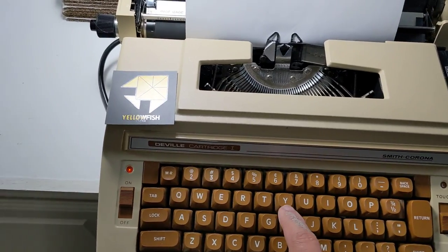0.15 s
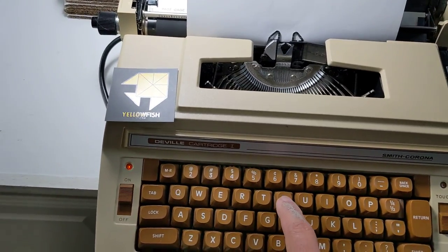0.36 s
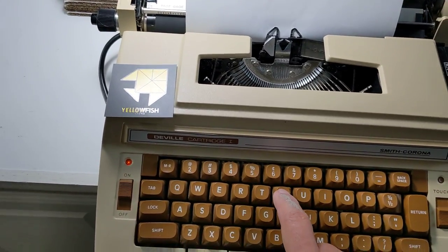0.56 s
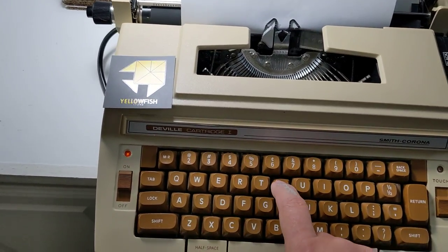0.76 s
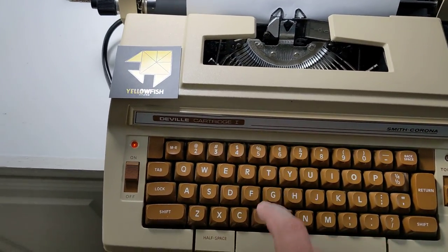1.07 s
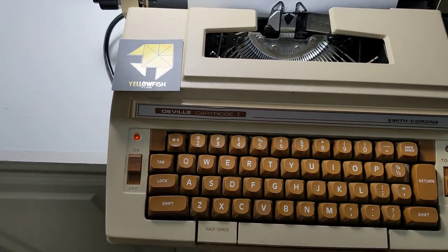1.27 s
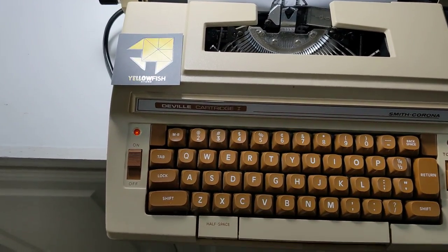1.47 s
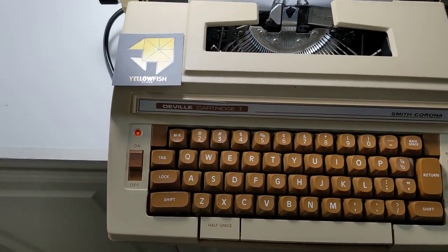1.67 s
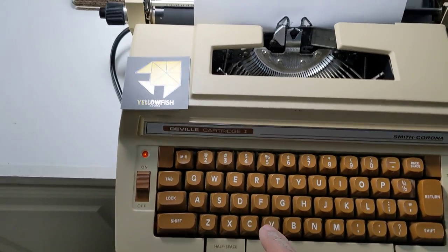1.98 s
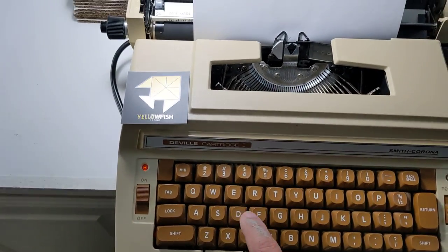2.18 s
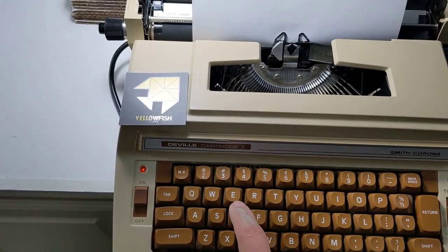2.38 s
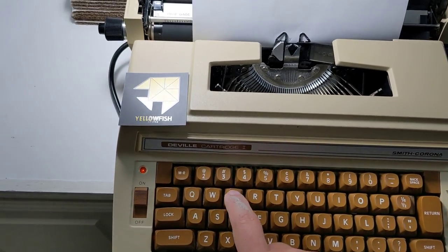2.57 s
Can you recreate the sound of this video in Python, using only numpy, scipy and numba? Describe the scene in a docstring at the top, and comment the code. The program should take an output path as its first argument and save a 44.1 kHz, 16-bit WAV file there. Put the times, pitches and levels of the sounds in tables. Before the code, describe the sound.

Electric typewriter hums steadily, then a single key snaps loudly with a short, hard room echo

```python
"""On a desk in a hard room, an electric typewriter idles close to a phone.
One key is pressed: linkage clicks, the type bar cracks on the platen, rattles back and the parts settle.
Each contact is a short noise burst that rings the metal frame and echoes in the room.
Behind it: belt ticks as small bursts, mains hum and motor whine as sines, casing and hiss as coloured noise.
A gain control ducks the hum under the stroke and lets it back as the room dies."""
import sys
import numpy as np
from scipy import signal
from scipy.io import wavfile
from scipy.ndimage import uniform_filter1d, minimum_filter1d
from numba import njit

SR = 44100
rng = np.random.default_rng(int(sys.argv[2]) if len(sys.argv) > 2 else 0)


def persist_wave(psi):
    """Save psi, clipped to +-1, as 16-bit WAV."""
    counts = np.round(np.clip(psi, -1, 1) * 32767).astype(np.int16)
    wavfile.write(sys.argv[1], SR, np.atleast_2d(counts).T)


N = 120393  # length of the scene [samples]


def amp(db):
    """Turn decibels into a factor on the wave."""
    return 10 ** (np.asarray(db) / 20)


def evened(x):
    """Scale to an rms of 1."""
    return x / np.sqrt(np.mean(x ** 2) + 1e-20)


def read(points, hz):
    """Read a table of (frequency, value) at any frequency, on a logarithmic scale."""
    f, value = np.transpose(points)
    return np.interp(np.log(hz + 1), np.log(f + 1), value)


def over_time(points):
    """Turn a table of (time [s], level [dB]) into a smooth run of gains."""
    s, db = np.transpose(points)
    return amp(np.interp(np.arange(N) / SR, s, db))


def sides(pan_db):
    """Left and right gains around the mean; positive leans left."""
    return amp([[pan_db / 2], [-pan_db / 2]])


def alike(a, b, same):
    """Mix two independent noises into a left-right pair with a given likeness."""
    return np.array([a, same * a + np.sqrt(1 - same ** 2) * b])


def drift(rate_hz):
    """Slow chance movement of rms 1, made by smoothing noise at one step per 64 samples."""
    steps = N // 64 + 2
    smoother = signal.butter(2, min(rate_hz * 128 / SR, .9))
    x = signal.lfilter(*smoother, rng.standard_normal(steps + 500))[500:]
    return np.interp(np.arange(N) / 64, np.arange(steps), evened(x))


def band(x, hz, width_hz):
    """A resonance of gain 1: lets through sound near one pitch."""
    r = np.exp(-np.pi * width_hz / SR)
    w = 2 * np.pi * min(hz, SR / 2.2) / SR
    return signal.lfilter([(1 - r * r) / 2, 0, -(1 - r * r) / 2], [1, -2 * r * np.cos(w), r * r], x)


RISE_SHARE = .12  # part of each contact's hold spent rising
GRAIN_DB, SAME_CONTACT = 3, .3  # roughness [dB rms], left-right likeness


def contacts(rows):
    """Parts that touch: grainy bursts that hold, die and take their own colour, at the energy of their row."""
    t = np.arange(8192) / SR
    out = np.zeros((2, N + len(t)))
    for s, db, hz, width_hz, hold_s, t60, pan_db in rows:
        a, b, grain = rng.standard_normal((3, len(t)))
        rise = np.minimum(t / (RISE_SHARE * hold_s), 1)
        shape = rise * amp(-60 * np.maximum(t - hold_s, 0) / t60)
        grainy = shape * amp(GRAIN_DB * evened(uniform_filter1d(grain, 24)))
        burst = alike(a, b, SAME_CONTACT) * grainy
        burst = band(band(burst, hz, width_hz), hz, 2 * width_hz)
        burst *= np.linalg.norm(shape) / np.linalg.norm(burst, axis=1, keepdims=True)
        at = round(s * SR)
        out[:, at:at + len(t)] += amp(db) * sides(pan_db) * burst
    return out[:, :N]


# Contacts in the key stroke: (time [s], level [dB], colour [Hz], colour width [Hz],
# hold [s], time to die by 60 dB before colouring [s], left-right [dB])
KEY_CONTACTS = [(.7612, -47, 7700, 1500, 0.00028, .012, -0.5), (.7612, -49, 11500, 7000, .002, 0.03, 4),
                (.762, -58, 3000, 4000, .01, .06, 3), (.7875, -42, 14000, 4000, .006, .04, 8),
                (.7875, -47, 1700, 3000, 0.022, 0.06, 6), (.7935, -43, 11500, 4000, 0.0016, .03, 1),
                (.8015, -29, 7200, 1800, 0.00073, 0.0099, -2.5), (.802, -43, 13000, 12000, .004, .06, 2),
                (.819, -30, 14000, 5000, .008, .02, 7), (.819, -35, 5500, 6100, .013, 0.011, 1),
                (.82, -25, 950, 1200, .012, .012, 4), (.821, -36, 400, 400, .012, .03, 0),
                (.824, -28, 2200, 1500, .003, .015, 7), (.8285, -16, 13600, 5000, .0042, .004, 4),
                (.836, -30, 12000, 8000, .006, .005, 0), (.842, 2, 2300, 1700, .0007, .005, 0),
                (.8422, 2, 5500, 3050, .0006, .006, 2), (.8424, -1, 8610, 2500, .0008, .006, -3),
                (.8445, -8, 4400, 1200, .001, .015, 0), (.8424, -4, 14800, 4000, .002, .02, 4),
                (.843, -22, 1050, 600, .04, .1, 0), (.843, -30, 350, 350, .02, .15, 0),
                (.843, -31, 80, 150, .03, .2, 1), (.8492, -7, 4500, 6000, .001, .035, -3),
                (.851, -14, 14500, 4000, .014, .04, 0), (.8638, -11, 5000, 2500, .0006, .015, -6),
                (.868, -8, 14700, 4000, .008, .03, 2), (.87, -15, 7000, 1200, .006, .03, -3),
                (.877, -14, 4500, 9000, .008, .14, -3), (.877, -21, 570, 60, .008, .04, -4),
                (.8853, -6, 14500, 4000, .002, .04, 0), (.955, -25, 3300, 5500, .05, .11, 0),
                (.96, -35, 800, 1200, .07, .18, 0), (.93, -39, 65, 80, .1, .15, 1),
                (.966, -15, 13500, 6000, .008, .015, 0), (1.1025, -44, 13800, 5000, .003, .02, -3),
                (1.155, -55, 13500, 6100, 0.0018, 0.017, -1)]


def key_stroke():
    """Linkage clicks, the crack of the type bar, its rattle back and the settling parts."""
    return contacts(KEY_CONTACTS)


# Faint ticks of the drive belt: (time [s], level [dB])
BELT_TICKS = [(0.2465, -60), (0.6467, -59), (1.647, -63), (1.777, -66), (2.251, -67), (2.6489, -66)]
# The three colours in each tick: (frequency [Hz], width [Hz], added level [dB])
TICK_COLOURS = [(2200, 2500, -3), (7000, 6000, -3), (14000, 4000, 0)]
TICK_HOLD_S, TICK_T60_S, TICK_PAN_DB = .002, .032, 4


def belt_ticks():
    """Each tick of the belt is three contacts at once, one per colour."""
    rows = []
    for s, db in BELT_TICKS:
        for hz, width_hz, more_db in TICK_COLOURS:
            rows.append((s, db + more_db, hz, width_hz, TICK_HOLD_S, TICK_T60_S, TICK_PAN_DB))
    return contacts(rows)


# What the metal frame and bars ring with: (frequency [Hz], relative level [dB], time to die by 60 dB [s])
FRAME_MODES = [(840, -8, .04), (1150, -8, .04), (1900, 1, .06), (2080, -1, .05), (2590, -4, .02),
               (3780, -2, .05), (4360, 0, .035), (4930, -2, .04), (5700, -5, .03), (6930, -1, .05),
               (7500, -4, .06), (8700, -2, .025), (11600, 0, .12), (14300, -3, .04)]
RING_DB = -15  # ringing, added to the direct contacts


def frame(x):
    """The contacts ring the machine's modes, each heard with another phase at each port."""
    t = np.arange(6000) / SR
    ring = np.zeros((2, len(t)))
    for hz, db, t60 in FRAME_MODES:
        turns = hz * t + rng.random((2, 1))
        ring += amp(db - 60 * t / t60) * np.sin(2 * np.pi * turns)
    ring /= np.linalg.norm(ring[0])
    return x + amp(RING_DB) * signal.fftconvolve(x, ring, axes=1)[:, :N]


# How long the room's early echoes last: (frequency [Hz], time to die by 60 dB [s])
ROOM_T60 = [(150, .34), (600, .32), (1200, .28), (2500, .29), (5000, .285), (9000, .24), (14000, .2)]
# Colour of the echoes: (frequency [Hz], relative level [dB])
ROOM_COLOUR = [(100, 0), (400, -13.5), (1000, 9), (2500, 6), (6000, 2), (10000, -4), (12000, -1),
               (15000, 1)]
ROOM_DB, ROOM_PAN_DB, ROOM_GAP_S = -3, -.8, .003  # the gap is the quiet before the first echo
LATE_DB, LATE_STRETCH = -26, 2.5  # fainter tail of the far walls, lasting this many times longer


def room(x):
    """Dense random echoes, each band dying at its own speed over a fainter long tail, other echoes per port."""
    taps = rng.standard_normal((2, SR)) * (np.arange(SR) > ROOM_GAP_S * SR)
    hz, t, z = signal.stft(taps, SR, nperseg=128)
    fall_db = -60 * t / read(ROOM_T60, hz)[:, None]
    fall = amp(fall_db) + amp(LATE_DB + fall_db / LATE_STRETCH)
    colour = amp(read(ROOM_COLOUR, hz))[:, None]
    tail = signal.istft(z * colour * fall, SR, nperseg=128)[1]
    tail /= np.linalg.norm(tail[0])
    return amp(ROOM_DB) * sides(ROOM_PAN_DB) * signal.fftconvolve(x, tail, axes=1)[:, :N]


MONO_HZ = 900  # below this, left and right grow alike


def narrow_bass(x):
    """Long waves reach both ports alike, so the left-right difference loses its bass."""
    side = (x[0] - x[1]) / 2
    bass = signal.lfilter(*signal.butter(1, MONO_HZ, fs=SR), side)
    return x - [[1], [-1]] * bass[None]


MAINS_HZ, SHAFT_HZ = 119.9, 58.13  # mains buzz, shaft speed
WAVER_HZ, PORT_LAG_S = 11, .0001  # fastest waver, delay of the right port
PHASE_WANDER = .22  # phase wander per dB of waver [rad rms]
ROOT_WAVER_DB = .5  # the mains buzz itself wavers least [dB rms]
# Drift of the hum's second multiple: (time [s], level [dB])
OCTAVE_SWELL = [(0, 3), (.3, 8), (.75, 7), (1.3, -1), (1.7, 2), (2.7, -3)]


def tones(orders, table, base_hz, waver_db):
    """Wavering sines on multiples of one speed, reaching the left port first."""
    t = np.arange(N) / SR - np.array([[0], [PORT_LAG_S]])
    out = np.zeros((2, N))
    for k, (db, pan_db) in zip(orders, table):
        hz = k * base_hz
        loose_db = ROOT_WAVER_DB if hz == MAINS_HZ else waver_db
        turn = 2 * np.pi * rng.random() + PHASE_WANDER * loose_db * drift(WAVER_HZ / 2)
        swell = over_time(OCTAVE_SWELL) if hz == 2 * MAINS_HZ else 1
        level = swell * np.sqrt(2) * amp(db + loose_db * drift(WAVER_HZ))
        out += level * sides(pan_db) * np.sin(2 * np.pi * hz * t + turn)
    return out


# Which multiples of the mains buzz are heard
HUM_ORDERS = 1, 2, 3, 4, 5, 6, 7, 8, 10
# Each multiple before waver and swell: (level [dB rms], left-right [dB])
HUM_LEVELS = [(-40, 2), (-71, -1), (-73, 2), (-73.5, 5), (-77.5, -2), (-82.5, -1), (-76.5, 2.5), (-79, 1),
              (-78, 0.5)]
# Slow drift of the whole hum: (time [s], level [dB])
HUM_SWELL = [(0, -4.5), (.1, -1.5), (.25, -2.5), (.6, -1), (1.5, 0.5), (2.3, -0.5), (2.73, -1)]


def mains_hum():
    """Steady buzz on multiples of the mains buzz, swelling slowly."""
    return tones(HUM_ORDERS, HUM_LEVELS, MAINS_HZ, waver_db=1.1) * over_time(HUM_SWELL)


# Which multiples of the shaft speed are heard
WHINE_ORDERS = 1, 9.2, 10, 13.44, 19, 20, 21.05, 23.06, 29.9, 32.95, 34, 38.13, 40.05, 56.97, 59.03
# Each multiple before waver: (level [dB rms], left-right [dB])
WHINE_LEVELS = [(-62, 3), (-74.5, -1.5), (-70.5, 2), (-82, 4.5), (-75.5, 5.5), (-68.5, 7.5), (-77, 2),
                (-82.5, -0.5), (-81, -1.5), (-85.5, 1), (-83.5, -2), (-88.5, 2.5), (-84.5, 1), (-80, 2.5),
                (-88, 4.5)]


def motor_whine():
    """The turning shaft whines on whole and in-between multiples of its speed."""
    return tones(WHINE_ORDERS, WHINE_LEVELS, SHAFT_HZ, waver_db=2.3)


# Casing resonances: (frequency [Hz], width [Hz], level before the swell [dB rms])
CASING_MODES = [(60, 31, -65.5), (96, 32, -68.5), (162.1, 52, -69), (239.4, 19, -76.5), (571.3, 70, -68.5),
                (688, 43, -77.5), (823.4, 40, -77), (1128, 90, -74), (1860, 1000, -75.5), (3270, 120, -86),
                (6350, 600, -80.5), (13900, 900, -81), (15300, 500, -77)]
# Drift of the casing noise: (time [s], level [dB])
CASING_SWELL = [(0, -2), (.7, -2), (1.3, 0), (2, 0), (2.7, 0)]
# Likeness of left and right, for casing and hiss: (frequency [Hz], likeness [-1 to 1])
NOISE_SAME = [(60, .98), (130, 1), (290, .95), (640, .76), (1410, .35), (3100, -.15), (6820, -.06),
              (15000, 0)]
# Lean of casing and hiss: (frequency [Hz], left-right [dB])
NOISE_PAN = [(60, 1.5), (200, 2), (700, 1.5), (1290, 6), (2380, 4), (4400, 3), (8120, 2), (15000, 7)]


def casing():
    """The motor's air and bearing noise rings the casing's resonances."""
    out = np.zeros((2, N))
    for hz, width_hz, db in CASING_MODES:
        a, b = rng.standard_normal((2, N))
        pair = alike(a, b, np.clip(read(NOISE_SAME, hz), 0, 1))
        ringing = evened(band(band(pair, hz, width_hz), hz, width_hz))
        out += amp(db) * sides(read(NOISE_PAN, hz)) * ringing
    return out * over_time(CASING_SWELL)


# Colour of the hiss: (frequency [Hz], relative level per Hz [dB])
HISS_COLOUR = [(20, -37), (40, -24), (70, -26.5), (130, -28.5), (200, -26), (400, -26.5), (700, -31),
               (1000, -27.5), (1500, -31), (2300, -38.5), (3500, -38.5), (5500, -40.5), (8000, -41.5),
               (10500, -44), (12500, -33.5), (15200, -29), (16500, -48.5)]
HISS_DB = -63.5  # whole hiss [dB rms]
PATCH_DB, FLICKER_DB = 2, 1.7  # uneven patches, shared treble flicker [dB rms]


def hiss():
    """Fan air and room floor: random short spectra with patches and a shared flicker."""
    frames, hz = N // 128 + 5, np.fft.rfftfreq(512, 1 / SR)[:, None]
    a, b, c, d, patches = rng.standard_normal((frames, 257, 5)).T
    patches = evened(uniform_filter1d(uniform_filter1d(patches, 8, 0), 16, 1))
    flicker = evened(uniform_filter1d(rng.standard_normal(frames), 5))
    left, right = alike(a + 1j * b, c + 1j * d, np.clip(read(NOISE_SAME, hz), -1, 1))
    lean = amp(read(NOISE_PAN, hz) / 2)
    level_db = read(HISS_COLOUR, hz) + PATCH_DB * patches + FLICKER_DB * flicker * (hz > 1500)
    z = np.array([left * lean, right / lean]) * amp(level_db)
    return amp(HISS_DB) * evened(signal.istft(z, nperseg=512, noverlap=384)[1][:, :N])


def scene():
    """The key stroke and belt ticks ring frame and room, over the running motor and hiss."""
    machine = frame(key_stroke() + belt_ticks())
    machine = narrow_bass(machine + room(machine))
    return machine + mains_hum() + motor_whine() + casing() + hiss()


@njit
def follow(x, up, down):
    """One-pole follower with its own speed upward and downward."""
    out, y = np.empty_like(x), 0.
    for i in range(len(x)):
        y += (up if x[i] > y else down) * (x[i] - y)
        out[i] = y
    return out


KNEE_DB, RATIO, DEPTH_DB = -35.5, 6, 16  # where ducking starts, how firmly, the most it may duck
SENSE_HZ, SENSE_S, AHEAD_S = 300, .0062, .005  # loudness is sensed above this pitch, over this time, ahead


def sensed_excess(dry):
    """How many dB to duck: a share of the loudness over the knee, at its highest in the moments ahead."""
    sensed = signal.lfilter(*signal.butter(2, SENSE_HZ, "high", fs=SR), dry)
    pole = 1 / (SENSE_S * SR)
    power = signal.lfilter([pole], [1, pole - 1], (sensed ** 2).mean(0))
    over_db = np.maximum(10 * np.log10(power + 1e-12) - KNEE_DB, 0) * (1 - 1 / RATIO)
    half = int(AHEAD_S * SR / 2)
    # the lowest of the negatives is the highest value ahead
    return -minimum_filter1d(-np.minimum(over_db, DEPTH_DB), 2 * half + 1, origin=-half)


GRAB_S, LET_GO_S, SLOW_S, SLOW_SHARE = .006, .033, .13, .2  # duck, quick and slow recovery, slow part


def gain_control(dry):
    """Pulls loud sound down and recovers in two stages."""
    over_db = sensed_excess(dry)
    quick = follow(over_db, 1 / (GRAB_S * SR), 1 / (LET_GO_S * SR))
    slow = follow(over_db, 1 / (GRAB_S * SR), 1 / (SLOW_S * SR))
    return dry / amp((1 - SLOW_SHARE) * quick + SLOW_SHARE * slow)


# Microphone colour: (frequency [Hz], level [dB])
MIC_COLOUR = [(40, -6), (60, 0), (700, 0), (850, -2), (1200, 0), (2000, -.6), (3000, 0), (4300, 2.2),
              (7000, 1), (10000, 0), (13000, -3), (16000, -1.5)]
SHELF_HZ, EDGE_HZ, SHELF_DB = 15900, 16800, -22  # a faint shelf between two edges, then nothing


def record(dry):
    """Gain control, then microphone colour and the upper band limit."""
    ducked = gain_control(dry)
    hz = np.linspace(0, SR / 2, 1025)
    mic = signal.firwin2(2047, hz, amp(read(MIC_COLOUR, hz)), fs=SR)
    coloured = signal.oaconvolve(ducked, mic[None], "same")
    low, top = (signal.firwin(511, f, window=("kaiser", 9), fs=SR) for f in (SHELF_HZ, EDGE_HZ))
    limit = low + amp(SHELF_DB) * (top - low)
    return signal.oaconvolve(coloured, limit[None], "same")


dry = scene()
out = record(dry)
persist_wave(out)
```